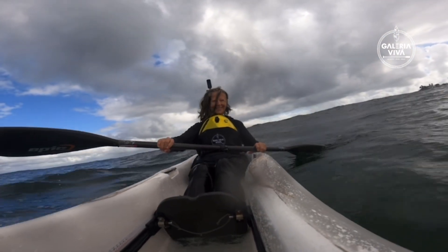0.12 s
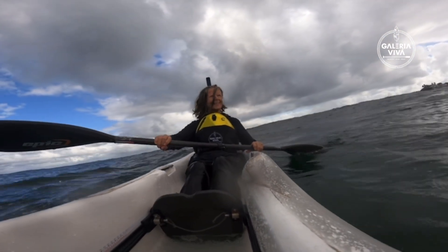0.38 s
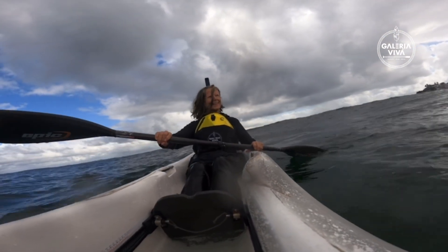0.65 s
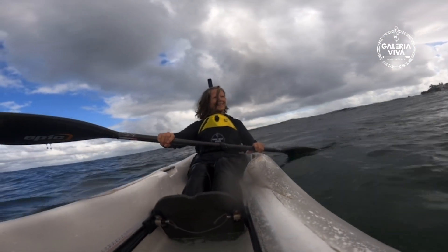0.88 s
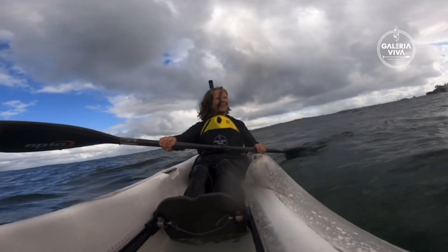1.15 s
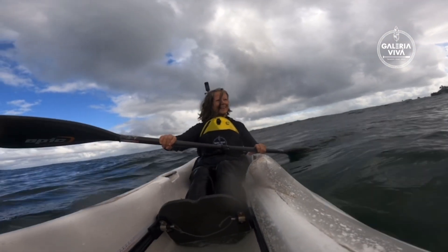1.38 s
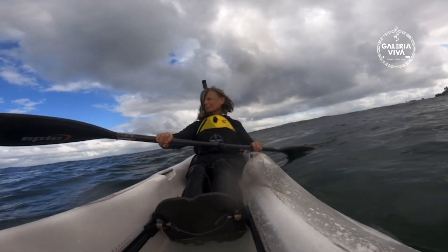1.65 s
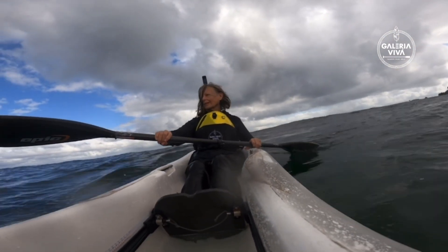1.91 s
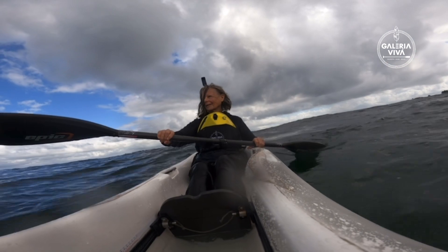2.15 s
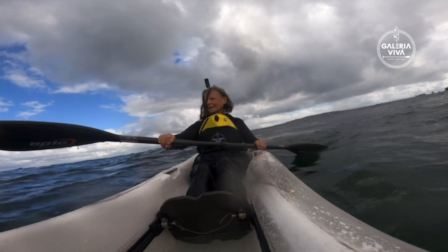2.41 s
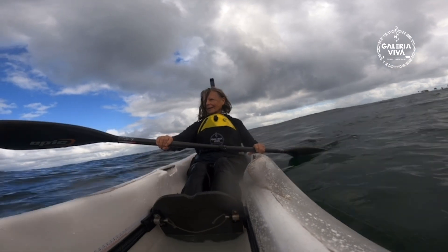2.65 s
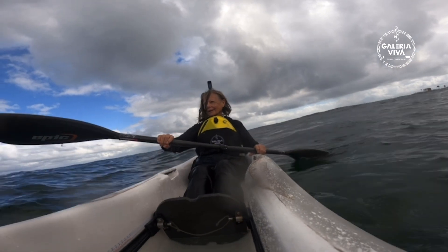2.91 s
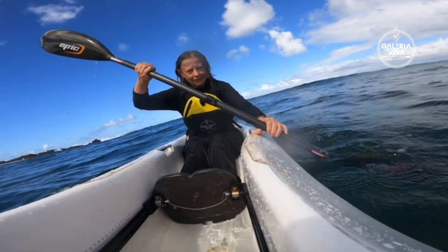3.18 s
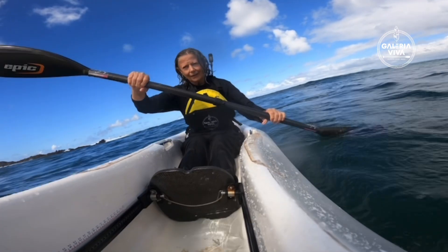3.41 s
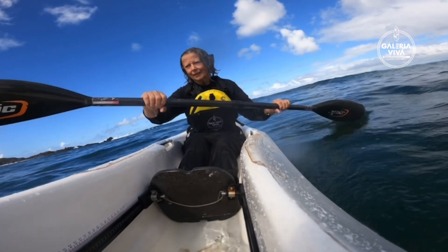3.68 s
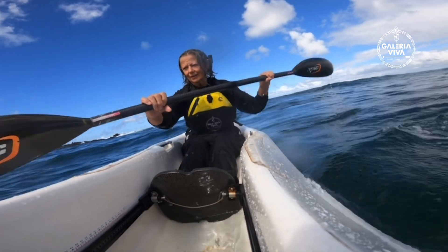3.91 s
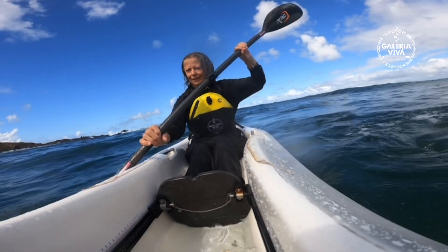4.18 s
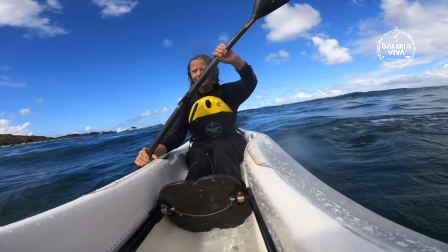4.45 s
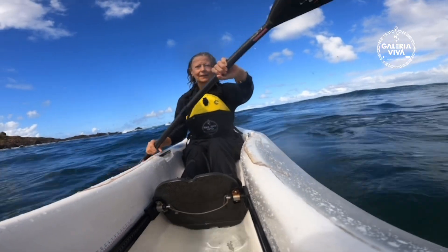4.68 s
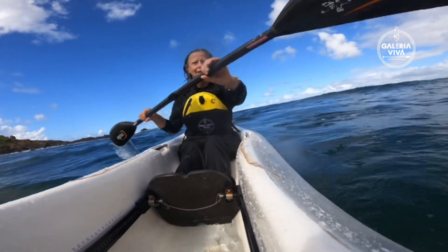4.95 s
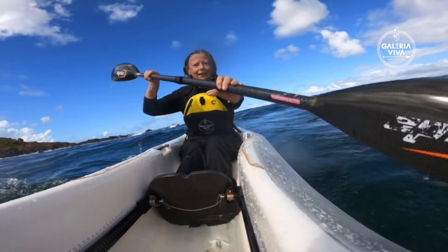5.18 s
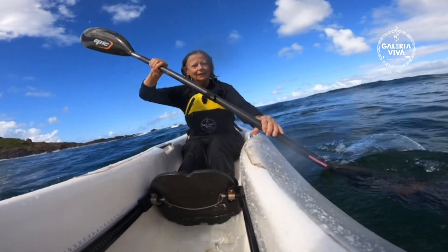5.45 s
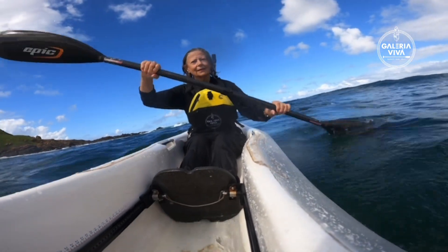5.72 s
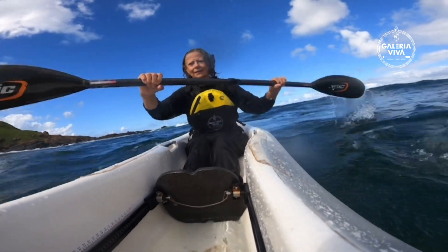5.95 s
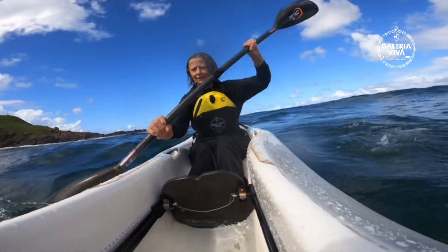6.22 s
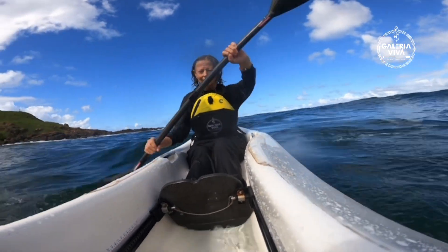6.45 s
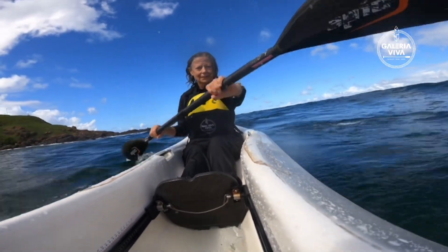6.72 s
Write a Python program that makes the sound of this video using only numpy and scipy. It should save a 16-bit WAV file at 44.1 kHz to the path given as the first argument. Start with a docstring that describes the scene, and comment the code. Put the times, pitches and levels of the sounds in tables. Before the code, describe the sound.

Mono, close and muffled, on a kayak in choppy open sea. A brief wind buffet opens at 0 s, then from 0 to 3 s the boat drifts: a dull, low-mid rush of water, fairly steady, over soft wind rumble, with faint high drips mostly in the first half second and a few near 2 to 2.6 s. Wind thuds around 1.6 s. At 3.02 s a small click and a very short silence, then paddling. Wash turns brighter and uneven; low thumps at 3.1 and 3.3, a gulping splash at 3.6, fine draining crackle from 3.7 to 4.2, splashes, bubbles and thumps at 4.0 to 4.6. Hollow bubble plops near 5.0 and 5.15, a dense gurgling burst at 5.7, swelling wash to 6.05, the sharpest slap with spray at 6.3, another at 6.67, bubbling and drips to the end at about 6.8.

```python
"""Kayak on a choppy sea

Wind, as filtered turbulence, buffets a muffled waterproof microphone on the hull throughout.
First the boat drifts through a dull rush of water made of flickering noise bands and ringing bubbles.
After a short silent splice it is paddled: brighter wash, spray, slaps, thumps and gulping bubbles come and go.
Drips, short tones of climbing pitch, tick in both parts, more densely after the splice.
A barely audible treble hiss flickers now and then.
"""
import sys
import numpy as np
from scipy import signal
from scipy.fft import rfft, irfft, next_fast_len
from scipy.io import wavfile

SR = 44100
rng = np.random.default_rng(int(sys.argv[2]) if len(sys.argv) > 2 else 0)


def digitize_waveform(pressure):
    """Quantize a signal to 16-bit integers and store it at the path in sys.argv[1].

    Rows of a 2-D input are taken as channels; values are limited to [-1, 1].
    """
    field = np.atleast_2d(pressure).T
    bounded = np.clip(field, -1, 1)
    quanta = np.round(bounded * 32767).astype(np.int16)
    wavfile.write(sys.argv[1], SR, quanta)


def rack_gain(trim_db):
    """Turn a fader trim in dB into the linear factor to multiply a signal by."""
    fader = np.asarray(trim_db, float)
    return 10 ** (fader / 20)


N = 301644

SILENCE_START_S, SILENCE_END_S = 3.0219, 3.0368   # drifting before, paddling after


def rms_one(x):
    """Normalisation: scales a signal to unit root-mean-square."""
    return x / np.sqrt(np.mean(x ** 2) + 1e-20)


def in_time(rows):
    """Linear interpolation: turns rows of (t/s, values..) into one curve per column."""
    s, *columns = np.transpose(rows)
    return [np.interp(np.arange(N) / SR, s, c) for c in columns]


def colour(x, points):
    """Linear filtering: weights the spectrum by (f/Hz, relative level/dB) over log frequency; rms 1."""
    size = next_fast_len(N)
    hz = np.arange(size // 2 + 1) * SR / size + 1
    corner_hz, corner_db = np.transpose(points)
    shape_db = np.interp(np.log(hz), np.log(corner_hz), corner_db)
    return rms_one(irfft(rfft(x, size) * rack_gain(shape_db), size)[:N])


def drift(rate):
    """Low-pass random process: two equal poles at rate (Hz) leave slow fluctuations of spread 1."""
    r = np.exp(-80 * np.pi * rate / SR)   # computed on every 40th sample
    slow = signal.lfilter([1], [1, -2 * r, r * r], rng.standard_normal(N // 40 + 2002))[2000:]
    return np.interp(np.arange(N) / 40, np.arange(len(slow)), rms_one(slow - slow.mean()))


def swells(starts, lengths, levels_db):
    """Incoherent addition: powers of bell-shaped swells centred on starts add, on a millisecond grid."""
    t = np.arange(0, N / SR + 1, 1 / 1000)
    power = 0
    for s, length, db in zip(starts, lengths, levels_db):
        power = power + rack_gain(2 * db) * np.exp(-(2 * (t - s) / length) ** 2)
    return np.interp(np.arange(N) / SR, t, power)


def patchy(points, shared_db, own_db, rate):
    """Turbulent modulation: half-octave noise bands flicker in level, partly together, partly alone."""
    low, high = points[0][0], min(points[-1][0], 16000)
    edges = low * 2 ** np.arange(0, np.log2(high / low) + 1, .5)
    white, together, out = rng.standard_normal((2, N)), drift(rate), 0
    for k, band in enumerate(zip(edges, np.minimum(edges[1:], .45 * SR))):
        # neighbouring bands take different noises
        noise = signal.sosfilt(signal.butter(2, band, "band", fs=SR, output="sos"), white[k % 2])
        out = out + noise * rack_gain(shared_db * together + own_db * drift(rate))
    return colour(out, points)


def fizz(points, per_s, cycles, spread_db):
    """Bubble resonance: small bubbles burst in random clumps, each swelling and ringing at its own pitch."""
    sizes = rack_gain(spread_db * np.minimum(rng.exponential(1, N), 4)) * rng.choice([-1, 1], N)
    born = rng.random(N) < per_s * rack_gain(4 * drift(9)) / SR
    pitches = np.geomspace(points[1][0], points[-2][0], 18)
    dealt, out = rng.integers(0, 18, N), 0
    for k, hz in enumerate(pitches):
        r = rack_gain(-120 * hz / (cycles * SR))   # pole radius: 120 dB lost in this many cycles
        w = 2 * np.pi * hz / SR
        resonance = [1, 0, -1, 1, -2 * r * np.cos(w), r * r]
        bursts = sizes * born * (dealt == k) + 1e-18
        ring = signal.sosfilt([resonance, resonance], bursts)   # twice: a soft start
        out = out + rms_one(ring) * np.sqrt(hz)                 # even power per Hz before colouring
    return colour(out, points)


def water(points, share, per_s, cycles, spread_db, shared_db, own_db):
    """Power partition: rushing noise gives up a share of its power to ringing bubbles."""
    rush = patchy(points, shared_db, own_db, rate=16.0)
    return np.sqrt(1 - share) * rush + np.sqrt(share) * fizz(points, per_s, cycles, spread_db)


def hiss():
    """Band-limited noise: a barely audible treble hiss comes and goes, with brief flickers added in power."""
    # slow level of the hiss: t/s, level/dB
    slow_hiss = [(0.2, -104), (0.96, -99.5), (1.7, -93.5), (1.95, -92), (2.2, -85), (2.3, -88), (2.8, -100),
                 (3.3, -92), (3.76, -99), (3.97, -88), (4.1, -86), (4.2, -103)]
    # brief flickers of the hiss: t/s, level/dB
    flickers = [(1.748, -78), (1.808, -86), (2.368, -74), (2.429, -86), (2.452, -72), (2.567, -82),
                (2.647, -81), (2.739, -86), (2.858, -86), (3.294, -85), (3.44, -84), (3.484, -78),
                (3.858, -80.5), (3.964, -79), (4.049, -76)]
    flicker_s = .006
    hiss_colour = [(10500, -34.0), (12200, -4.5), (13500, -6.0), (14500, -17.5), (15500, -38.5)]
    s, db = np.transpose(flickers)
    power = rack_gain(2 * in_time(slow_hiss)[0]) + swells(s, np.full(len(s), flicker_s), db)
    return np.sqrt(power) * colour(rng.standard_normal(N), hiss_colour)


def wind():
    """Turbulent pressure: eddies buffet the housing in lumps and gusts, over a deeper rumble."""
    # wind on the housing: t/s, buffet level/dB, rumble level/dB
    wind_levels = [(0.0, -20.5, -51), (0.04, -38, -37.5), (0.38, -30, -31.5), (0.59, -33.5, -45.5),
                   (0.66, -34.5, -29), (0.72, -31.5, -41), (0.76, -34, -36.5), (1.5, -32, -40),
                   (1.58, -38, -28.5), (1.85, -32.5, -42), (2.3, -34, -36), (2.48, -35, -45),
                   (2.93, -33, -29), (3.05, -35.5, -36.5), (3.12, -32, -30), (3.92, -36.5, -46),
                   (4.19, -32, -30), (5.33, -36.5, -28), (5.89, -35, -42.5), (6.06, -38, -40),
                   (6.1, -27, -46), (6.15, -30, -38), (6.31, -33, -32.5), (6.55, -30.5, -39.5),
                   (6.8, -47, -31), (6.84, -23, -31)]
    # sudden gusts that thump the housing: start t/s, length/s, level/dB
    gusts = [(0.135, 0.069, -30.5), (1.57, 0.034, -28.5), (1.632, 0.13, -27.5), (3.25, 0.034, -27),
             (3.389, 0.11, -28.5), (3.59, 0.025, -35), (4.108, 0.08, -25), (4.253, 0.11, -29),
             (4.415, 0.031, -27), (4.5, 0.14, -34), (4.574, 0.18, -27.5), (5.052, 0.03, -30),
             (5.636, 0.032, -32), (5.717, 0.018, -35), (5.913, 0.02, -29), (6.002, 0.062, -25),
             (6.148, 0.062, -36), (6.273, 0.03, -25.5), (6.365, 0.022, -25.5), (6.662, 0.02, -24.5),
             (6.722, 0.098, -25)]
    # spectra of buffet and rumble: f/Hz, relative level/dB
    buffet_colour = [(70, -12), (110, 0), (160, 2.5), (250, 3), (330, -3), (420, -11), (600, -27)]
    rumble_colour = [(12, -33), (22, 0.5), (40, 1.5), (70, 2.5), (110, -3), (170, -25)]
    buffet_db, rumble_db = in_time(wind_levels)
    s, length, db = np.transpose(gusts)
    level = np.sqrt(rack_gain(2 * buffet_db) + swells(s + length / 2, length, db))
    buffet = patchy(buffet_colour, shared_db=-1.38, own_db=1.5, rate=13.0)
    rumble = patchy(rumble_colour, shared_db=0.66, own_db=-0.9, rate=1.1)
    return level * buffet + rack_gain(rumble_db) * rumble


def sea():
    """Flow noise with bubble resonance: dull while drifting, brighter and splashing while paddling."""
    # flow along the hull, drifting then paddling: t/s, wash level/dB, spray level/dB, fine spray level/dB
    drifting = [(0.03, -31.5, -58.5, -79), (0.3, -31.5, -57.5, -78.5), (0.6, -32.5, -57.5, -81.5),
                (1.0, -32, -59.5, -81), (1.35, -32, -59, -84.5), (1.7, -33, -58, -82),
                (2.05, -32.5, -59.5, -84), (2.41, -33.5, -58.5, -83), (2.7, -35, -60, -85),
                (3.01, -32.5, -59.5, -83)]
    paddling = [(3.04, -31, -49, -73), (3.1, -37, -56, -79.5), (3.45, -32.5, -50.5, -77),
                (3.7, -31.5, -48.5, -79.5), (3.78, -32.5, -48.5, -74), (3.97, -34.5, -51, -78),
                (4.16, -34.5, -50.5, -76.5), (4.55, -32, -50.5, -76), (4.91, -30, -49, -74),
                (5.49, -30, -46, -72.5), (5.69, -29.5, -43, -75), (5.85, -28, -47.5, -77),
                (6.05, -26.5, -46.5, -74), (6.15, -39, -45, -76), (6.23, -35, -49, -72),
                (6.3, -35, -43, -75), (6.55, -29, -44, -75), (6.84, -30.5, -49.5, -75)]
    # splashes of blade and chop: peak t/s, length/s, wash level/dB, spray level/dB
    splashes = [(0.13, 0.0087, -25.5, -47), (0.346, 0.015, -33, -60), (3.105, 0.017, -32, -50),
                (3.166, 0.034, -48, -53), (3.3, 0.024, -54, -45), (3.608, 0.043, -26, -48),
                (3.698, 0.016, -48, -46), (3.83, 0.085, -30, -54), (4.061, 0.036, -32.5, -40),
                (4.04, 0.038, -41, -48), (4.11, 0.045, -36, -45), (4.141, 0.023, -40, -44),
                (4.273, 0.048, -34, -44), (4.086, 0.1, -42, -49.5), (4.48, .04, -34.5, -53),
                (4.534, 0.078, -32, -41.5), (4.646, 0.0058, -45, -43), (4.744, 0.04, -27.5, -45),
                (4.974, 0.033, -29, -45.5), (5.029, 0.026, -33, -42), (5.434, 0.011, -46, -36.5),
                (5.725, 0.02, -27, -52), (5.75, 0.024, -44, -50), (6.005, 0.053, -41, -42.5),
                (6.168, 0.085, -29.5, -44), (6.303, 0.034, -32, -39), (6.257, 0.023, -35, -37),
                (6.41, 0.028, -27.5, -57), (6.71, 0.1, -32.5, -44)]
    # spectra of the flow while drifting: f/Hz, relative level/dB
    dull_wash_colour = [(160, -45.5), (280, -13), (356, -6), (392, -2), (614, -7), (764, -6.5),
                        (880, -10.5), (1110, -12), (1440, -19.5), (1700, -26), (1900, -40.5), (2470, -68),
                        (4180, -120)]
    dull_spray_colour = [(1200, -18.5), (1700, 2), (2200, -7.5), (2800, -16), (3300, -20), (3700, -26),
                         (4300, -38), (5500, -56.5)]
    # spectra of the flow while paddling, the fine spray being common to both: f/Hz, relative level/dB
    wash_colour = [(160, -37.5), (280, 0.5), (378, -5), (576, -1.5), (667, -6.5), (800, -1), (1160, -7.5),
                   (1430, -18), (1600, -21.5), (2080, -50), (3520, -120)]
    spray_colour = [(1000, -36), (1350, -1), (1500, -4.5), (1700, 0.5), (1900, -1.5), (2200, 2), (2500, -5),
                    (3100, -21), (3500, -25), (3750, -32.5), (4000, -44), (5000, -62)]
    fine_colour = [(2800, -24), (3700, -0.5), (4100, -7), (4500, -4), (5000, -6.5), (6300, -15),
                   (8000, -31.5), (10000, -51.5)]
    fine_under_spray_db = 43   # in each splash

    early = np.arange(N) / SR < SILENCE_END_S
    wash_db, spray_db, fine_db = np.where(early, in_time(drifting), in_time(paddling))
    s, length, splash_wash_db, splash_spray_db = np.transpose(splashes)
    thrown_wash = swells(s, length, splash_wash_db)
    thrown_spray = swells(s, length, splash_spray_db)
    thrown_fine = thrown_spray * rack_gain(-2 * fine_under_spray_db)

    dull_wash = patchy(dull_wash_colour, shared_db=0.22, own_db=-0.42, rate=5.5)
    dull_spray = water(dull_spray_colour, share=0.098, per_s=310, cycles=38, spread_db=-0.5,
                       shared_db=-1.5, own_db=1.0)
    wash = water(wash_colour, share=0.18, per_s=220, cycles=17.8, spread_db=2.5, shared_db=1.0, own_db=-0.5)
    spray = water(spray_colour, share=0.33, per_s=600, cycles=49, spread_db=0.5, shared_db=2.0, own_db=3.0)
    fine = water(fine_colour, share=.3, per_s=370, cycles=13, spread_db=2.5, shared_db=0.0, own_db=-1.6)

    all_wash = np.sqrt(rack_gain(2 * wash_db) + thrown_wash) * np.where(early, dull_wash, wash)
    all_spray = np.sqrt(rack_gain(2 * spray_db) + thrown_spray) * np.where(early, dull_spray, spray)
    return all_wash + all_spray + np.sqrt(rack_gain(2 * fine_db) + thrown_fine) * fine


def spray_top():
    """Bubble resonance: finer bubbles ring higher and brighten the spray at some moments of the stroke."""
    # brightest part of the spray while paddling: t/s, level/dB
    top_levels = [(3.04, -73), (3.3, -61), (3.6, -62.5), (3.9, -75), (4.5, -59.5), (4.9, -64), (5.2, -61.5),
                  (5.55, -57), (5.85, -73), (6.0, -65), (6.08, -61), (6.15, -61), (6.2, -56), (6.24, -61),
                  (6.3, -51), (6.38, -59), (6.6, -57.5), (6.84, -64)]
    # its spectrum: f/Hz, relative level/dB
    top_colour = [(2000, -23.5), (2600, 4.5), (3100, -3), (3600, -13), (3900, -26.5), (4600, -50.5)]
    paddled = np.arange(N) / SR >= SILENCE_END_S
    top = water(top_colour, share=0.35, per_s=350, cycles=20.0, spread_db=2.5, shared_db=3.0, own_db=-0.5)
    return paddled * rack_gain(in_time(top_levels)[0]) * top


def streaming():
    """Dense random impulses: tiny drops burst as a bright crackle while the lifted blade drains."""
    # water streaming off the blade: t/s, level/dB
    stream_levels = [(3.68, -100), (3.77, -79), (3.87, -79), (3.93, -81.5), (4.05, -78), (4.09, -86),
                     (4.25, -100)]
    # spectrum of the crackle: f/Hz, relative level/dB
    crackle_colour = [(3500, -20.5), (4500, 2), (6000, -1), (7800, -9.5), (8600, -24.5), (10500, -27),
                      (12000, -43.5)]
    crackle = water(crackle_colour, share=.5, per_s=900, cycles=9.0, spread_db=5.5, shared_db=2.0, own_db=1.0)
    return rack_gain(in_time(stream_levels)[0]) * crackle


def thumps():
    """Heavily damped oscillation: the hull swings briefly under each wave, in a bell-shaped envelope."""
    # waves thumping the hull: peak t/s, peak level/dB, f/Hz, length/s
    waves = [(3.126, -20.5, 70, 0.0065), (3.292, -17, 54.7, .009), (4.165, -23, 120, 0.0084),
             (4.196, -21, 170, 0.013), (4.287, -18.5, 83.6, 0.018), (4.6, -19.5, 111, 0.0055),
             (6.034, -26.5, 189, .014)]
    t, out = np.arange(N) / SR, np.zeros(N)
    for s, db, hz, length in waves:
        near = slice(round((s - 3 * length) * SR), round((s + 3 * length) * SR))
        age = t[near] - s
        out[near] += rack_gain(db) * np.exp(-(age / length) ** 2) * np.cos(2 * np.pi * hz * age)
    return out


def slaps():
    """Impact noise: water slaps the hull in sudden broad bursts that decay exponentially."""
    # water slapping the hull: t/s, level/dB, 60 dB decay time/s
    impacts = [(3.292, -27, 0.029), (4.276, -37, 0.025), (4.975, -29, .02), (5.139, -28, 0.025),
               (5.716, -39, .023), (5.739, -31, 0.016), (6.224, -30, 0.023), (6.2985, -14, 0.06),
               (6.669, -18, 0.024)]
    # spectrum of a slap: f/Hz, relative level/dB
    slap_colour = [(120, -31.5), (450, 8.5), (800, 4.5), (1100, -6.5), (1400, -12.5), (1700, -13),
                   (3100, -8), (3800, -43.5), (4500, -35), (6300, -49.5), (8000, -77.5)]
    t, envelope = np.arange(N) / SR, np.zeros(N)
    for s, db, t60 in impacts:
        age = np.clip(t - s, 0, 1)
        envelope += rack_gain(db - 60 * age / t60) * (1 - np.exp(-age / 0.0018)) ** 2
    return envelope * colour(rng.standard_normal(N), slap_colour)


def drips():
    """Damped resonance: each drop is a short climbing tone with a noise burst around its pitch."""
    # drops ticking on the deck: t/s, peak level/dB, f/Hz
    drops = [(0.11, -64, 3690), (0.111, -60, 2860), (0.127, -64, 2650), (0.139, -45.5, 3100),
             (0.143, -61, 2350), (0.161, -52, 2960), (0.205, -68, 3830), (0.261, -57, 2550),
             (0.283, -52, 2410), (0.315, -57, 2900), (0.341, -57, 2750), (0.371, -48, 1900),
             (0.389, -50, 3610), (0.3885, -52, 3900), (0.388, -58, 4250), (0.458, -59, 2400),
             (0.49, -57, 2400), (0.7084, -56, 3540), (1.9, -46.5, 2130), (2.3523, -55, 3100),
             (2.355, -52, 2250), (2.41, -53, 2220), (2.57, -45, 2080), (2.57, -59, 2880),
             (3.065, -52, 2940), (3.097, -50, 2850), (3.154, -40, 2000), (3.175, -38.5, 2030),
             (3.29, -52, 3410), (3.295, -31.5, 2180), (3.296, -45, 2880), (3.325, -41.5, 1980),
             (3.351, -42, 2200), (3.365, -49, 2170), (3.438, -43, 1930), (3.459, -36, 2100),
             (3.555, -47, 2430), (3.59, -40, 2250), (3.61, -39, 2250), (3.625, -43, 2250),
             (3.645, -47, 2260), (3.664, -45, 2470), (3.673, -59, 3350), (3.438, -46.5, 3450),
             (3.767, -62.5, 5030), (3.738, -66, 4090), (3.787, -56, 3500), (3.815, -53, 3400),
             (3.817, -68, 5400), (3.868, -62, 4900), (3.906, -63, 5400), (3.918, -67, 4600),
             (3.944, -62, 4610), (3.975, -62, 4300), (3.985, -62, 4700), (4.046, -67, 4500),
             (4.05, -68, 7200), (4.068, -63, 4500), (3.86, -60, 4570), (3.9, -54, 4500), (3.959, -63, 5800),
             (4.05, -66, 5800), (4.014, -40, 2140), (4.03, -39, 2180), (4.05, -36, 2140),
             (4.081, -34, 2010), (4.108, -40, 2430), (4.114, -33.5, 1790), (4.117, -50, 2920),
             (4.15, -52, 3000), (4.2783, -49, 3200), (4.279, -36, 2170), (4.258, -61, 3800),
             (4.423, -38, 2150), (4.445, -35.5, 2380), (4.482, -57, 3460), (4.502, -36.5, 1960),
             (4.532, -31, 1670), (4.533, -60, 3500), (4.642, -38, 2340), (4.642, -55, 3680),
             (4.688, -50, 3200), (4.978, -40, 2130), (4.987, -48, 2160), (5.048, -47, 3280),
             (5.116, -40, 2570), (5.078, -50, 3440), (5.197, -44, 2900), (5.248, -34.5, 1780),
             (5.31, -59, 3600), (5.316, -40, 2660), (5.338, -54, 5000), (5.338, -65, 5700),
             (5.392, -59, 3500), (5.43, -41, 2500), (5.498, -41, 2950), (5.5, -34, 2190),
             (5.519, -50, 3500), (5.654, -53, 3500), (5.726, -38, 2350), (5.74, -27, 2170),
             (5.746, -39, 2510), (5.776, -46, 1600), (5.772, -35, 2250), (6.02, -38, 2480),
             (6.123, -44, 1810), (6.191, -36, 2060), (6.216, -54, 3700), (5.554, -64, 5600),
             (6.148, -37.5, 2730), (6.22, -60, 4600), (6.255, -45, 3040), (6.3, -37, 2910),
             (6.303, -32.5, 2300), (6.316, -42, 2910), (6.411, -47, 3060), (6.449, -39, 2140),
             (6.477, -46, 3170), (6.492, -50, 3470), (6.494, -42, 1900), (6.5034, -57, 4530),
             (6.626, -60.5, 4400), (6.688, -45, 3050), (6.704, -32, 2180), (6.728, -45, 3000),
             (6.815, -37, 2180), (6.528, -52, 3700), (6.6733, -42, 3340), (6.702, -41, 2830),
             (6.727, -55, 3380)]
    rise_s, t60_cycles, lead_s = .001, 55, .0035
    width_oct, climb_oct_per_s, tone_share = .2, 3.0, .5
    out, t = np.zeros(N + SR), np.arange(SR // 20) / SR
    for (s, db, hz), noise in zip(drops, rng.standard_normal((len(drops), len(t)))):
        envelope = rack_gain(-60 * t * hz / t60_cycles) * (1 - np.exp(-t / rise_s))
        edges = hz * 2 ** (width_oct * np.array([-.5, .5]))
        band = signal.butter(3, edges, "band", fs=SR, output="sos")
        tick = signal.sosfilt(band, noise * envelope)
        cycles = np.cumsum(hz * 2 ** (climb_oct_per_s * t)) / SR
        tone = signal.sosfilt(band, envelope * np.sin(2 * np.pi * cycles))
        drop = (1 - tone_share) * tick / np.abs(tick).max() + tone_share * tone / np.abs(tone).max()
        out[round((s - lead_s) * SR):][:len(t)] += rack_gain(db) * drop / np.abs(drop).max()
    return out[:N]


def bubbles(rise, cycles, tick_db):
    """Volume resonance: an air pocket swells fast, fades slower and climbs in pitch after its drop's tick."""
    # bubbles gulping at the hull, with a few faint, high, drawn-out drips:
    # peak t/s, peak level/dB, f/Hz, length/s
    gulps = [(0.168, -66, 3660, 0.012), (0.245, -60, 3000, 0.012), (0.495, -69.5, 3670, 0.02),
             (3.52, -48, 2200, 0.013), (3.611, -41.5, 2230, 0.02), (5.032, -24.5, 993, 0.014),
             (5.751, -20, 850, 0.005), (6.0, -28, 850, 0.0052), (3.59, -20, 415, 0.02),
             (3.5946, -29.5, 1177, 0.029), (3.607, -23.5, 902, 0.024), (3.11, -27, 990, 0.008),
             (3.599, -28, 640, 0.013), (3.618, -40, 570, 0.012), (3.628, -16, 780, 0.0068),
             (3.694, -33, 2160, 0.01), (3.757, -30.5, 1490, 0.0053), (4.047, -27.5, 1120, 0.012),
             (4.059, -24.5, 723, 0.014), (4.076, -30.5, 786, 0.0078), (4.091, -33, 1150, 0.011),
             (4.131, -16, 275, 0.0059), (4.256, -27, 1176, 0.01), (4.265, -17, 294, 0.017),
             (4.37, -30, 1340, 0.007), (4.926, -19.5, 760, 0.0055), (4.977, -24, 1205, 0.0098),
             (5.049, -31, 1030, 0.013), (5.1423, -11, 820, 0.0038), (5.1445, -22, 1266, 0.0079),
             (5.145, -20, 1014, 0.0082), (5.17, -41, 860, 0.018), (5.196, -30, 1000, 0.01),
             (5.265, -31, 950, 0.0091), (5.315, -29, 1030, 0.01), (5.333, -26.5, 1050, 0.019),
             (5.364, -33, 920, 0.01), (5.523, -22.5, 690, 0.0079), (5.5523, -18, 547, 0.012),
             (5.598, -26, 630, 0.011), (5.673, -18.5, 816, 0.0098), (5.696, -19.5, 770, 0.0058),
             (5.717, -11.5, 720, 0.0039), (5.738, -17, 1024, 0.0052), (5.756, -22.5, 1270, 0.0068),
             (5.769, -24, 1050, 0.0061), (5.73, -14.5, 690, 0.0061), (5.719, -28, 346, 0.011),
             (5.724, -31.5, 2020, 0.0071), (5.74, -28, 1760, 0.0044), (5.741, -13, 1166, 0.0057),
             (6.303, -28, 1677, 0.014), (6.0286, -22, 473, 0.0092), (6.047, -19.5, 353, 0.0079),
             (6.11, -24.5, 561, 0.016), (6.228, -24.5, 804, 0.008), (6.36, -25, 526, 0.016),
             (6.09, -28, 796, .012), (5.81, -29, 1050, .006), (6.473, -26, 577, 0.008),
             (6.2992, -17, 790, 0.0043), (6.309, -21, 464, 0.0033), (6.321, -19, 251, 0.014),
             (6.524, -26, 614, 0.024), (6.651, -18.5, 900, 0.0043), (6.669, -17, 255, 0.009),
             (6.724, -19, 870, 0.0077), (6.732, -16.5, 612, 0.0054), (6.83, -21.5, 864, 0.0075)]
    # three quieter bubbles surround each one, scattered in time and pitch
    companions_db, companions_oct, companions_s = -15.5, 0.33, 0.022
    out, chance = np.zeros(N + SR), rng.uniform(-1.1, 1, (len(gulps), 3, 2))
    around = []
    for (s, db, hz, length), draws in zip(gulps, chance):
        for late, up in draws:
            around.append((s + companions_s * late, db + companions_db, hz * 2 ** (companions_oct * up), length))
    for (s, db, hz, length), phase in zip(list(gulps) + around, rng.random((4 * len(gulps), 2))):
        length = max(length, .002)
        t = np.arange(-int(2 * length * SR), int(2 * length * SR)) / SR
        swell = rack_gain(-24 * (t / length) ** 2 * np.where(t < 0, 2, .7))
        tone = swell * np.sin(2 * np.pi * (phase[0] + hz * t * (1 + rise * t / length / 2)))
        since = (t + length / 4) * hz   # cycles from the impact
        tick = rack_gain(tick_db - 20 * (since / cycles) ** 2) * np.sin(2 * np.pi * (phase[1] + 1.1 * since))
        out[round((s + t[0]) * SR):][:len(t)] += rack_gain(db) * (tone + tick) * signal.windows.tukey(len(t), .5)
    return out[:N]


def scene():
    """Superposition: the pressures of wind, water and hull add in one channel."""
    flow = wind() + sea() + spray_top() + streaming()
    strikes = thumps() + slaps() + drips()
    return (flow + strikes + bubbles(rise=0.011, cycles=2.0, tick_db=-10.5))[None]


def top_cut(x):
    """Nothing passes above the cut-off."""
    return signal.sosfilt(signal.butter(12, 16000, fs=SR, output="sos"), x)


def record(dry):
    """Gating: the sound, with its flickering hiss, clicks, drops out and fades back at the splice."""
    click_db, click_s, fade_in_s = -26.5, .0008, 0.0014
    t = np.arange(N) / SR
    before = t < SILENCE_START_S
    # the cut falls in mid-swing and clicks
    click = -rack_gain(click_db) * np.exp(np.minimum(t - SILENCE_START_S, 0) / click_s) * before
    on = before + np.clip((t - SILENCE_END_S) / fade_in_s, 0, 1)
    mix = (dry + hiss() + click) * on
    return top_cut(mix)


dry = scene()
out = record(dry)
digitize_waveform(out)
```